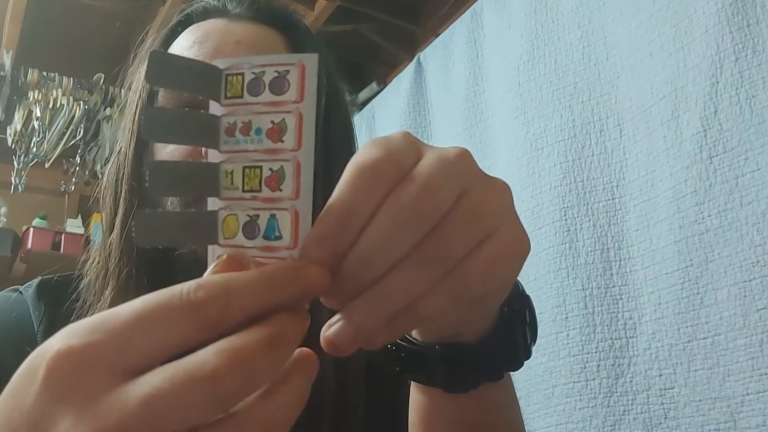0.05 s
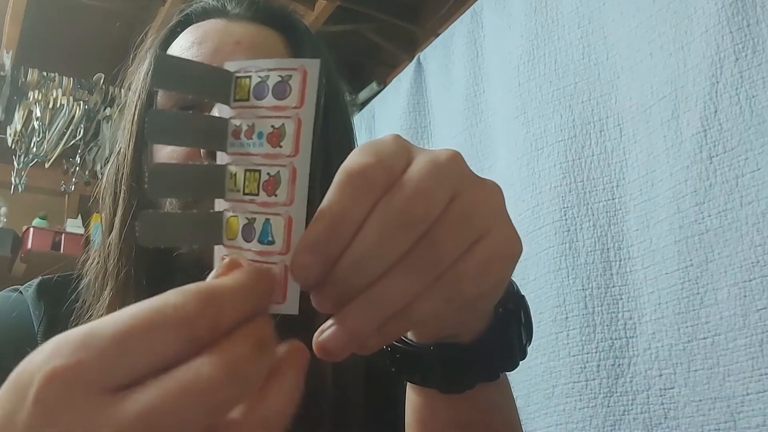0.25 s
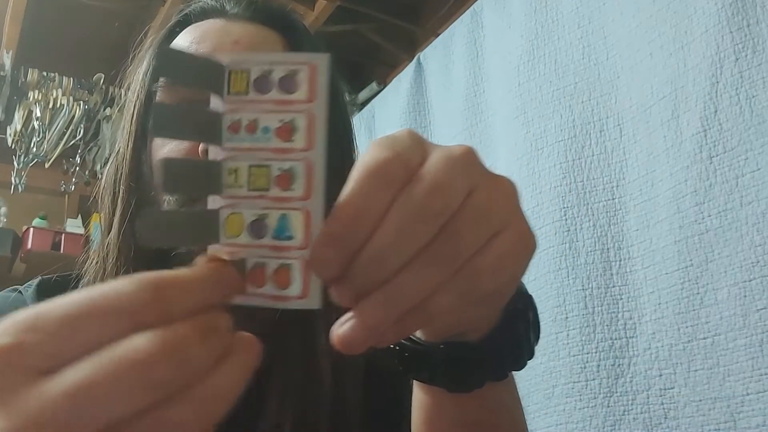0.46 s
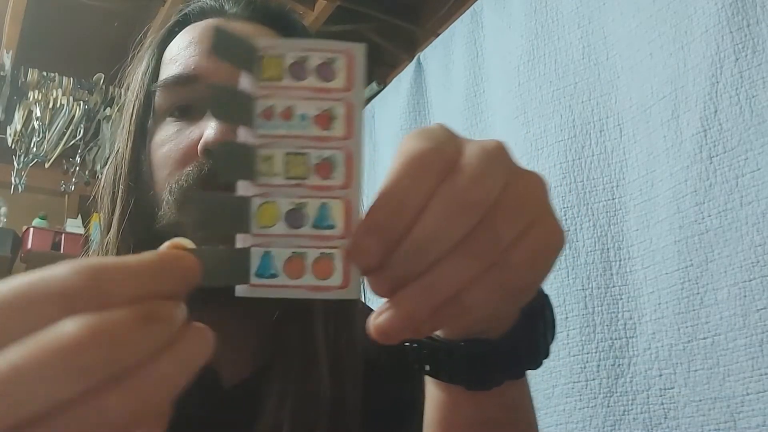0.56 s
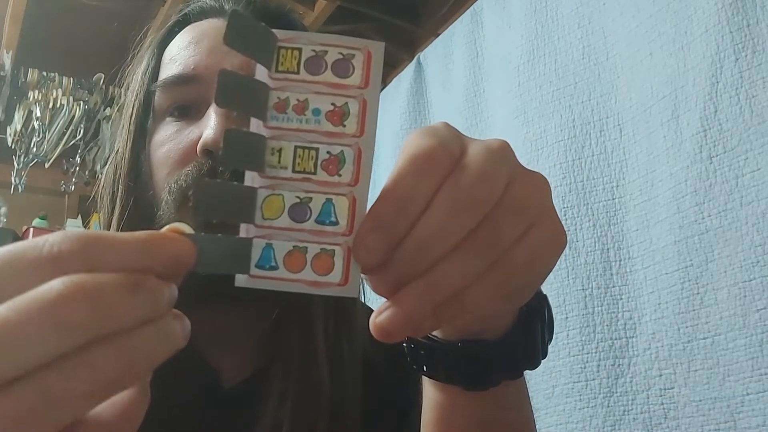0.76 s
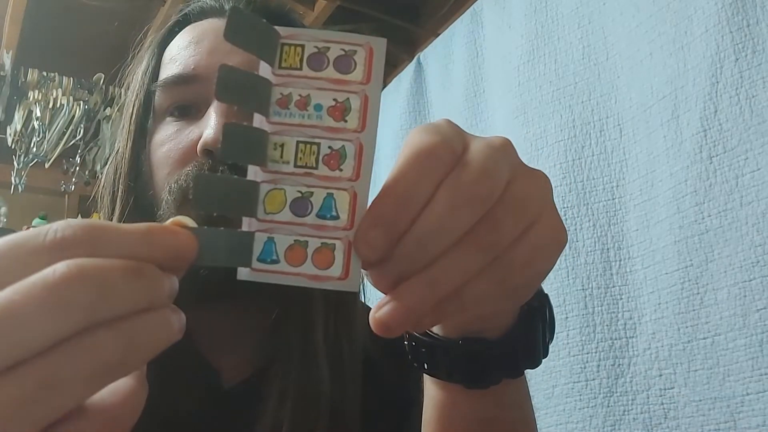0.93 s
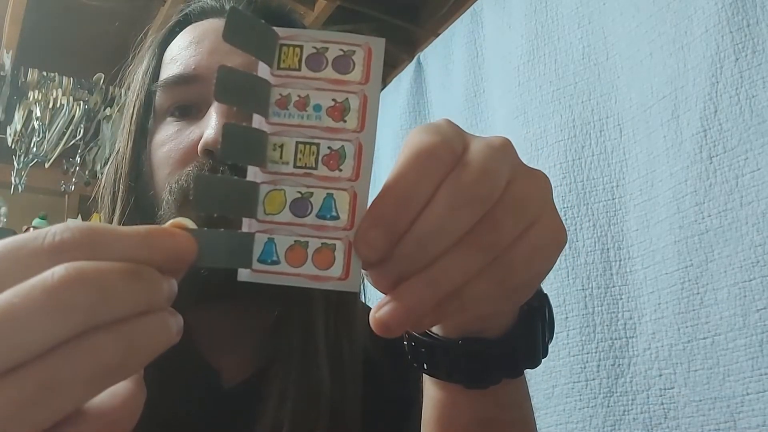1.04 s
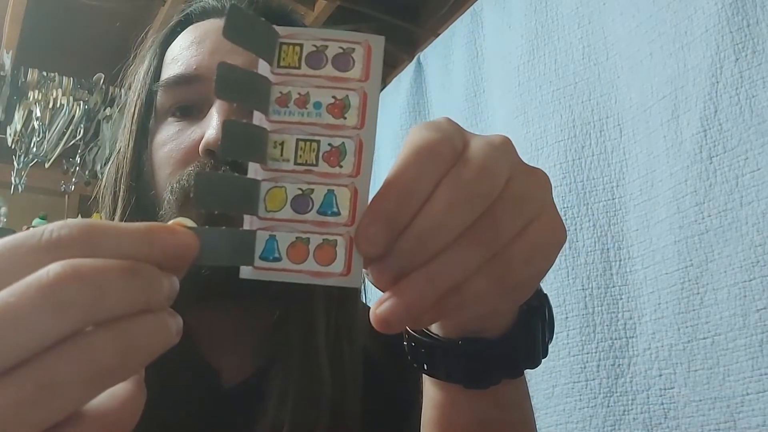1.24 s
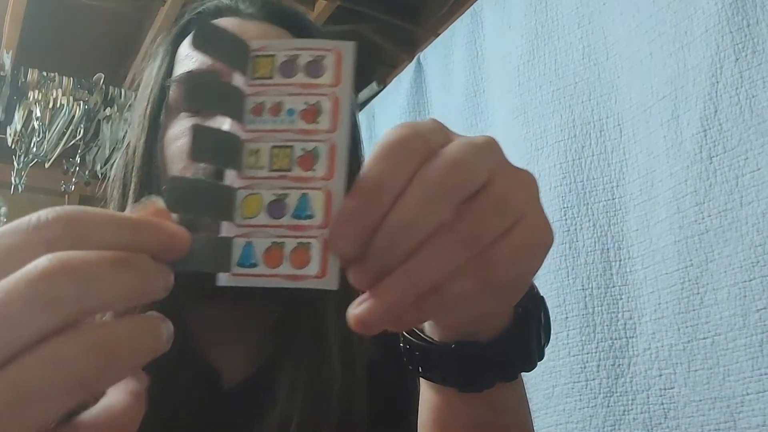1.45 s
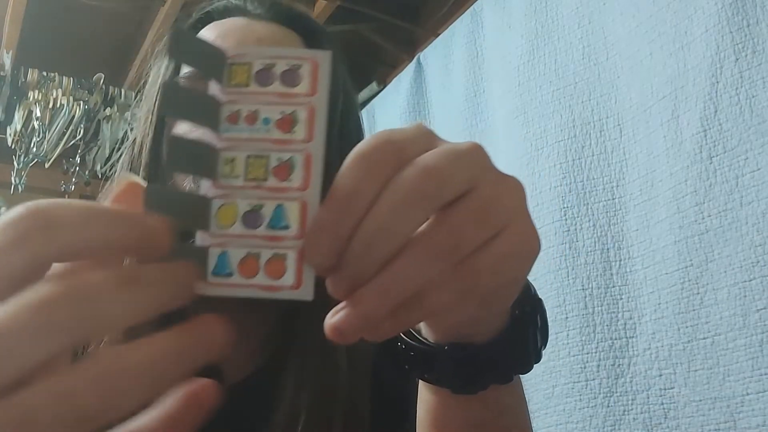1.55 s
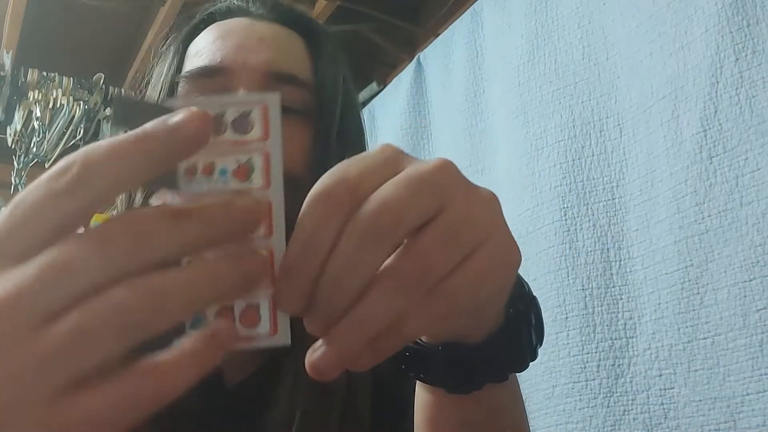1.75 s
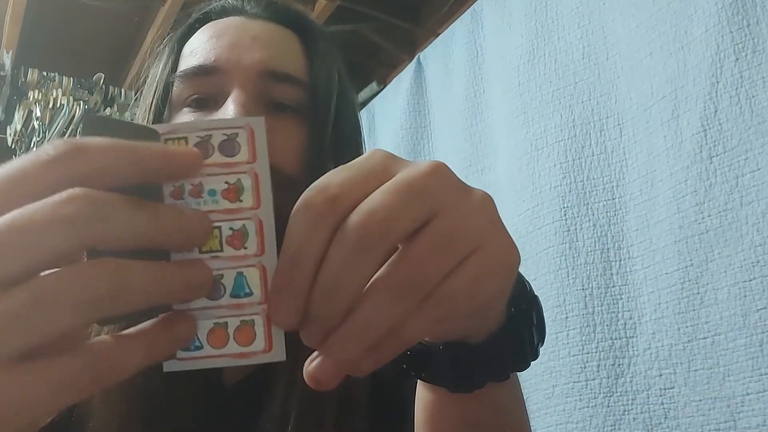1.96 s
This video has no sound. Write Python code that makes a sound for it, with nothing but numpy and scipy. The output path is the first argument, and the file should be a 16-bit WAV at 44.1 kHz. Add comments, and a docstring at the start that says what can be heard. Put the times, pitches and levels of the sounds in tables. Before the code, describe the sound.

A perforated paper tab is torn open close to the microphone. A light finger tick at 0.12 seconds leads to sharp, bright snaps at 0.21-0.24, then a second run at 0.41-0.52, with hollow card pops, small thumps and grainy rubbing. Near quiet follows, with low room rumble, a faint drone and hiss, until soft finger ticks and slides around 1.82-1.95 seconds.

```python
"""A perforated tab is torn open on a small card ticket, close to the listener in a small, quiet room.
The paper bridges break in quick runs of snaps: bright cracks of shaped noise, over damped sine modes
for the hollow pop of the flexing card, its thump, the ringing tab and a low knock in the grip.
Fingers tick and slide on the card around the tear and again after a pause, as short cracks and grainy noise.
Rumble, a fuzzy drone and hiss lie behind in filtered noise. The right channel hears everything slightly late."""
import sys
import numpy as np
from scipy import signal
from scipy.fft import rfft, irfft, next_fast_len
from scipy.io import wavfile
from scipy.ndimage import uniform_filter1d, map_coordinates

SR = 44100
rng = np.random.default_rng(int(sys.argv[2]) if len(sys.argv) > 2 else 0)


def generate_wav(signal):
    """Clip the signal to [-1, 1] and save it as 16-bit WAV at the path in sys.argv[1]."""
    frames = np.transpose(np.atleast_2d(signal))
    scaled = np.clip(frames, -1, 1) * 32767
    pcm = np.round(scaled).astype(np.int16)
    wavfile.write(sys.argv[1], SR, pcm)


N = 88200  # two seconds
SNAP_SIZE = 2048  # samples in one crack


def amp(db):
    """Decibels to gain."""
    return 10 ** (np.asarray(db) / 20)


def unit(x):
    """Scale to rms 1."""
    return x / np.sqrt(np.mean(x ** 2) + 1e-20)


def decay(t, t60):
    """Exponential fade that falls 60 dB in t60 seconds."""
    return np.exp(-np.log(1000) * t / t60)


def along(points, hz):
    """Read (Hz, value) points on a log frequency axis."""
    point_hz, value = np.transpose(points)
    return np.interp(np.log(hz + 1), np.log(point_hz + 1), value)


def peaks_db(peaks, hz):
    """The boost from a set of narrow resonances."""
    return sum(db / (1 + ((hz - centre) / width) ** 2) for centre, width, db in peaks)


def pan(db):
    """Left and right gains for a level difference, left minus right."""
    return amp(np.array([[db], [-db]]) / 2)


def add(track, s, sound):
    """Mix a sound into a track at a time in seconds."""
    part = track[:, max(0, round(s * SR)):][:, :sound.shape[1]]
    part += sound[:, :part.shape[1]]


def filtered(x, response):
    """Multiply the spectrum by a response of frequency, padded so that nothing wraps round early."""
    size = next_fast_len(N + SR // 2)
    hz = np.fft.rfftfreq(size, 1 / SR)
    return irfft(rfft(x, size) * response(hz), size)[..., :N]


def causal(gain_db):
    """The minimum-phase response with these levels, made by folding the cepstrum forward in time."""
    cepstrum = irfft(np.log(amp(gain_db)))
    half = len(cepstrum) // 2
    cepstrum[1:half] *= 2
    cepstrum[half + 1:] = 0
    return np.exp(rfft(cepstrum))


def noise(colour, alike):
    """Stereo noise of rms 1; colour gives dB and alike the left-right likeness at each frequency."""
    def mid_side_gains(hz):
        turn = np.arccos(np.clip(along(alike, hz), -1, 1)) / 2
        return amp(colour(hz)) * [np.cos(turn), np.sin(turn)]

    mid, side = filtered(rng.standard_normal((2, N)), mid_side_gains)
    return unit(np.array([mid + side, mid - side]))


def background():
    """Low room rumble, a fuzzy drone and faint hiss, each noise with its own spectrum."""
    # Low room rumble. Each row: frequency in Hz, relative level in dB per Hz.
    rumble_colour = [(20, -41.5), (35, -19.5), (50, -10), (85, -2.5), (125, 0.5), (170, -1), (250, -8),
                     (310, -7.5), (370, -10), (450, -11), (600, -24), (900, -21), (1500, -36),
                     (3000, -59.5)]
    # Faint hiss. Each row: frequency in Hz, relative level in dB per Hz.
    hiss_colour = [(300, -23.5), (1200, 1.5), (2000, 1), (4200, 0.5), (5500, -5), (8400, -7), (9700, -20.5),
                   (10700, -11.5), (11700, -3.5), (12500, -17.5), (13500, -29.5)]
    # Stereo width of the background. Each row: frequency in Hz, left-right likeness from 0 to 1.
    floor_alike = [(60, 0.95), (200, 0.89), (400, 0.92), (620, 0.15), (850, .55), (1200, 0.067),
                   (3000, 0.044)]
    rumble_db, drone_db, hiss_db = -58, -67.5, -83.5
    drone_hz, drone_width_hz = 212.8, 62

    def drone_colour(hz):
        return -20 * np.log10(1 + (2 * (hz - drone_hz) / drone_width_hz) ** 2)

    rumble = noise(lambda hz: along(rumble_colour, hz), floor_alike)
    drone = noise(drone_colour, floor_alike)
    hiss = noise(lambda hz: along(hiss_colour, hz), floor_alike)
    return amp(rumble_db) * rumble + amp(drone_db) * drone + amp(hiss_db) * hiss


def room(x):
    """A short diffuse answer of the walls: noise fading at a rate for each frequency, different on each side."""
    # Decay of the room. Each row: frequency in Hz, t60 in seconds.
    room_t60 = [(200, 0.15), (900, 0.16), (2500, 0.12), (7000, 0.14), (12000, 0.065), (16000, 0.061)]
    # Colour of the room. Each row: frequency in Hz, relative level in dB.
    room_colour = [(200, 6.5), (500, -3.5), (750, -5), (1000, -7), (1600, 0.5), (3000, -4.5), (7000, 0),
                   (12000, 3), (13500, -7), (16000, -7.5)]
    delay_s, build_s = 0.0019, 0.001
    hz, t, grid = signal.stft(rng.standard_normal((2, SR // 2)), SR, nperseg=256)
    fade = decay(t, along(room_t60, hz)[:, None])
    colour = amp(along(room_colour, hz))[:, None]
    tail = signal.istft(grid * fade * colour, SR, nperseg=256)[1]
    tail_t = np.arange(tail.shape[1]) / SR
    tail = tail * np.clip((tail_t - delay_s) / build_s, 0, 1)
    tail = tail / np.linalg.norm(tail, axis=1, keepdims=True)  # energy 1 on each side
    return signal.fftconvolve(x, tail, axes=1)[:, :N]


def crack(colour):
    """A few milliseconds of breaking fibres: a noise burst evened out across frequency and then coloured."""
    # Narrow resonances of the card. Each row: centre in Hz, half-width in Hz, boost in dB.
    card_peaks = [(2750, 110, 7), (3630, 98, 7.5), (4303, 160, 6), (5380, 220, 3.5), (7230, 73, 1.5),
                  (11740, 330, 6.5)]
    share = 0.52  # part of the noise power that both sides have in common
    attack_s, hold_s = 0.00025, 0.0013
    body_t60_s = 0.013  # the card stops buzzing after the fibres give way
    treble_hz, treble_t60_s = 5860, 0.006  # the top of a crack dies sooner
    t = np.arange(SNAP_SIZE) / SR
    hz = np.fft.rfftfreq(SNAP_SIZE, 1 / SR)
    fibres = rng.standard_normal((3, SNAP_SIZE))
    pair = np.sqrt(share) * fibres[0] + np.sqrt(1 - share) * fibres[1:]
    pair = pair * np.minimum(t / attack_s, 1)
    after_hold = np.maximum(t - hold_s, 0)
    body = rfft(pair * decay(after_hold, body_t60_s))
    top = rfft(pair * decay(after_hold, treble_t60_s))
    treble = hz ** 2 / (hz ** 2 + treble_hz ** 2)
    bursts = (1 - treble) * body + treble * top
    # subtracting each burst's own smoothed spectrum evens it out
    broad_db = 10 * np.log10(uniform_filter1d(abs(bursts) ** 2, size=70, axis=1))
    wanted_db = colour(hz) + peaks_db(card_peaks, hz)
    return np.array([irfft(burst * causal(wanted_db - own_db)) for burst, own_db in zip(bursts, broad_db)])


def ring(hz, t60):
    """One damped sine mode with a soft onset."""
    t = np.arange(3 * SNAP_SIZE) / SR
    attack_s = 0.001
    return np.sin(2 * np.pi * hz * t) * decay(t, t60) * (1 - np.exp(-t / attack_s))


def fingers():
    """Skin on card: light ticks as small cracks, and slides as grainy noise that follows the pressure."""
    # Fingertips touching the card. Each row: start in seconds, level in dB.
    touches = [(0.1227, -12), (1.823, -39.5), (1.8609, -30.5), (1.8767, -30)]
    # Colour of a fingertip tick. Each row: frequency in Hz, level in dB.
    tick_colour = [(300, -22.5), (1000, -6.5), (1600, -13), (2800, -9), (3500, -10.5), (4400, 2),
                   (5800, -2.5), (7700, 4), (9600, -12.5), (11600, -13.5), (13200, -26), (17000, -34)]
    # Fingers rubbing the card. Each row: start, length, attack and release in seconds, level in dB.
    slides = [(0.008, 0.019, 0.0069, 0.014, -74.5), (0.163, 0.039, 0.045, 0.011, -65.5),
              (0.297, .03, 0.023, .012, -69), (0.416, 0.018, 0.0071, 0.042, -53),
              (0.458, 0.09, 0.05, 0.017, -54.5), (1.394, 0.021, 0.0074, 0.055, -78.5),
              (1.481, 0.033, 0.019, 0.019, -83.5), (1.83, 0.047, 0.04, .012, -64.5),
              (1.898, 0.049, 0.042, 0.051, -58)]
    # Colour of the rubbing. Each row: frequency in Hz, relative level in dB per Hz.
    rub_colour = [(300, -4), (1000, -11), (1600, -8.5), (2800, -5), (3600, -2), (5500, -3), (7900, 1.5),
                  (9700, -7), (11700, 0.5), (13200, -16.5), (15500, -18), (17000, -28)]
    # Card resonances under a sliding finger. Each row: centre in Hz, half-width in Hz, boost in dB.
    rub_peaks = [(2710, 120, 11), (3620, 130, 7.5), (5100, 180, 6.5), (6700, 180, 4), (7900, 280, 4.5)]
    grain_db, grains_per_s = 3, 250
    t = np.arange(N) / SR
    pressure = np.zeros(N)
    for s, length, attack, release, db in slides:
        rise = np.clip((t - s) / attack, 0, 1)
        fall = np.exp(-np.maximum(t - s - length, 0) / release)
        pressure += amp(db) * rise * fall
    # a smooth random level makes the slide grainy
    grain = amp(grain_db * map_coordinates(rng.standard_normal(N), [t * grains_per_s]))
    skin = noise(lambda hz: along(rub_colour, hz) + peaks_db(rub_peaks, hz), [(1000, 0.62)])
    out = pressure * unit(grain * skin)
    for s, db in touches:
        add(out, s, amp(db) * crack(lambda hz: along(tick_colour, hz)))
    return out


def tearing():
    """Each bridge cracks, sets card and tab ringing and jerks the ticket in the grip."""
    # Breaking paper bridges. Each row: start in seconds, crack level in dB, brightest frequency in Hz,
    # its boost in dB, tilt in dB per octave, pop level in dB, pop pitch in Hz, thump level in dB,
    # tab ring level in dB, knock level in dB, left minus right of the crack in dB.
    bridges = [(0.2068, -17.5, 11400, 7.5, 1.43, -52, 1000, -66, -66.5, -76, -3.5),
               (.2140, -1, 3630, 9, -2.3, -28.5, 1110, -58.5, -46, -64, -2),
               (0.2277, -0.5, 6900, 6.5, -5.06, -26.5, 1070, -56, -37.5, -65, -3.5),
               (0.241, -1, 11100, 7.5, -0.06, -18, 1007, -46.5, -36.5, -62, -1.5),
               (0.4133, -14.5, 2800, 2, -2, -37.5, 997, -47, -59, -66.5, 0),
               (0.4183, -2, 3800, 5, -2.2, -22.5, 1000, -37.5, -47, -49.5, 2.5),
               (0.4379, -6.5, 2700, 9, -1.5, -14.5, 950, -23, -46, -57.5, 1.5),
               (0.4906, -15.5, 4930, 0.5, 1.7, -37, 895, -42.5, -60.5, -68, 3),
               (0.4986, -0.5, 4000, 6.5, -2.9, -18.5, 950, -17.5, -50, -43, 2),
               (.5190, 1.5, 4222, 5.5, 3.74, -21, 926, -29.5, -50.5, -47, 1.5)]
    # Colour shared by all cracks. Each row: frequency in Hz, level in dB.
    crack_colour = [(200, -19.5), (600, -19.5), (1100, -10), (1500, -5), (2000, -5.5), (2800, -3),
                    (3300, -8), (4300, -0.5), (5600, -4), (7400, 4), (9400, -6.5), (11500, -2),
                    (13300, -13), (15300, -6.5), (17000, -25)]
    # Bending modes of the card. Each row: multiple of the pop pitch, level in dB, t60 in seconds,
    # left minus right in dB.
    flex_modes = [(1.02, 1, 0.026, -0.5), (.85, -8, 0.021, -13.5)]
    # Ringing of the freed tab. Each row: frequency in Hz, mean level in dB, t60 in seconds.
    tab_modes = [(1232.3, -5, .09), (1470, -1.5, 0.1), (1602, -4, .07), (1760, -3, .07),
                 (1984.5, -2, 0.061), (2749, -3.5, 0.049)]
    bright_octaves, tab_scatter_db = 0.42, 1.5
    low_cut_hz = 396  # a small card radiates little below this
    thump = pan(-9) * ring(720, t60=0.012)  # the whole card jerks as a bridge lets go
    knock = ring(235, t60=0.09)[None]
    paper, grip = np.zeros((2, N)), np.zeros((2, N))
    for s, crack_db, bright_hz, bright_db, tilt, pop_db, pop_hz, thump_db, tab_db, knock_db, side_db in bridges:
        def octaves(hz, centre_hz):
            return np.log2(np.maximum(hz, pop_hz) / centre_hz)  # flat below the pop

        def colour(hz):
            bright = bright_db * np.exp(-(octaves(hz, bright_hz) / bright_octaves) ** 2)
            return along(crack_colour, hz) + tilt * octaves(hz, centre_hz=5000) + bright

        pop = sum(amp(db) * pan(lean_db) * ring(multiple * pop_hz, t60)
                  for multiple, db, t60, lean_db in flex_modes)
        # each tab mode varies in level from snap to snap and side to side
        tab = sum(amp(db + rng.normal(0, tab_scatter_db, (2, 1))) * ring(hz, t60)
                  for hz, db, t60 in tab_modes)
        add(paper, s, amp(crack_db) * pan(side_db) * crack(colour))
        add(paper, s, amp(pop_db) * pop + amp(thump_db) * thump + amp(tab_db) * tab)
        add(grip, s, amp(knock_db) * knock)
    low_cut = signal.butter(4, low_cut_hz, "high", fs=SR, output="sos")
    return grip + signal.sosfilt(low_cut, paper)


def scene():
    """The ticket, its room and the background."""
    room_db, floor_pan_db = -13, -1.1
    ticket = tearing() + fingers()
    return ticket + amp(room_db) * room(ticket) + pan(floor_pan_db) * background()


def record(dry):
    """The right channel runs late, and the treble ends steeply at the band limit."""
    right_lag_s, top_hz, top_order = 0.0042, 16200, 90
    delay_s = np.array([[0], [right_lag_s]])

    def response(hz):
        lag = np.exp(-2j * np.pi * hz * delay_s)
        return lag / (1 + (hz / top_hz) ** top_order)

    return filtered(dry, response)


dry = scene()
out = record(dry)
generate_wav(out)
```